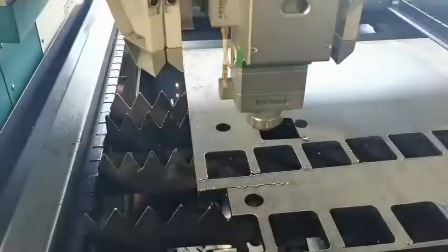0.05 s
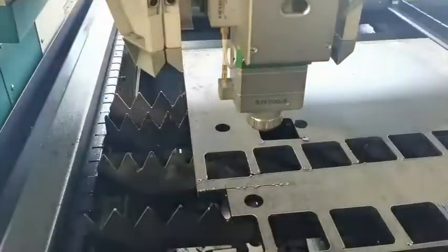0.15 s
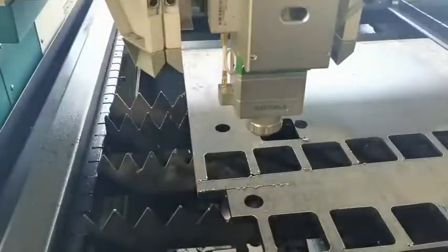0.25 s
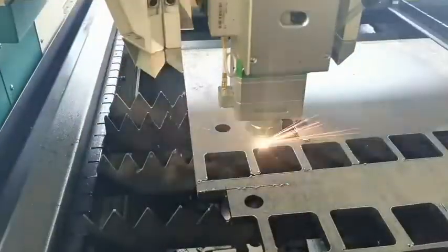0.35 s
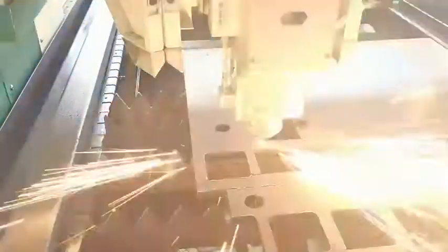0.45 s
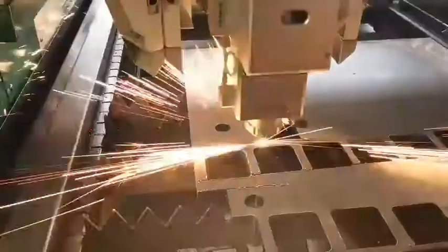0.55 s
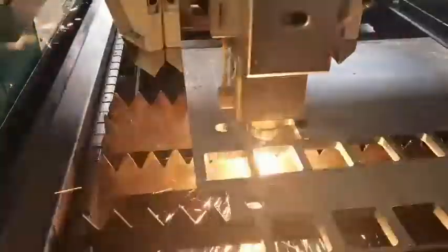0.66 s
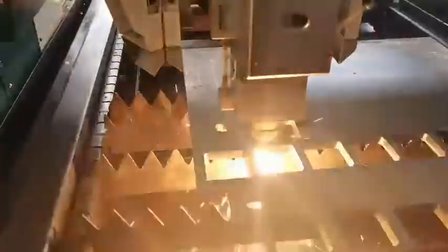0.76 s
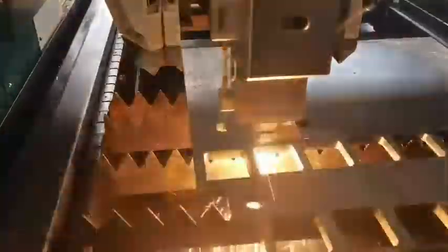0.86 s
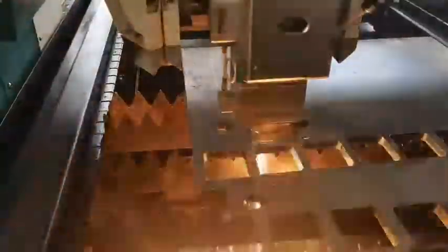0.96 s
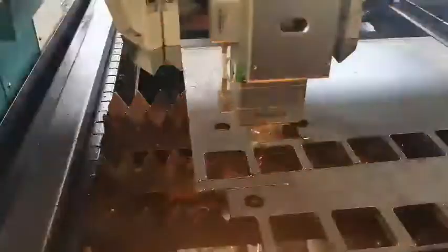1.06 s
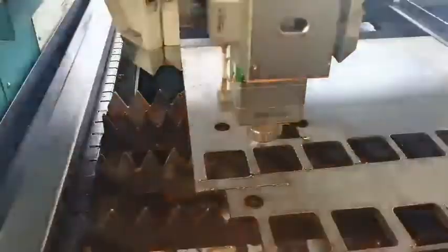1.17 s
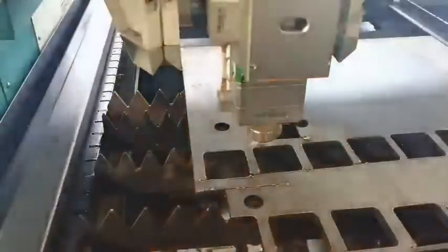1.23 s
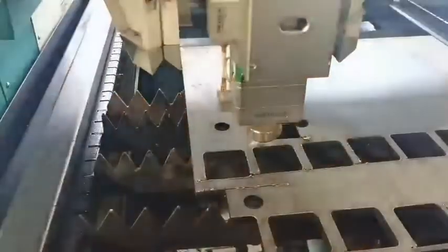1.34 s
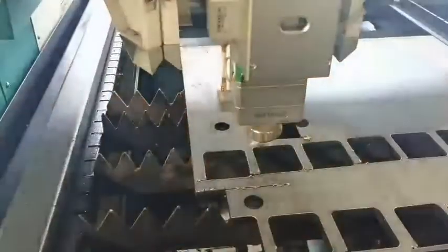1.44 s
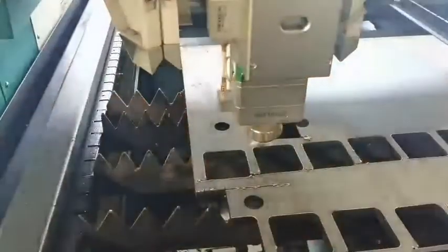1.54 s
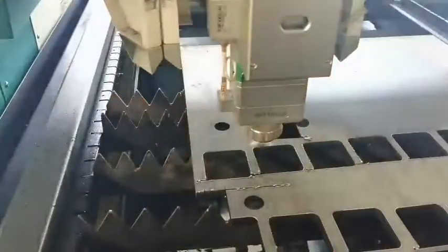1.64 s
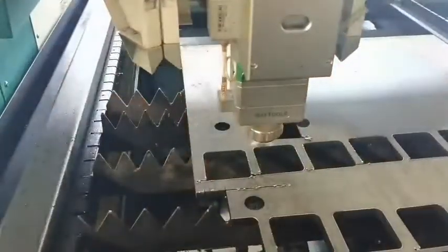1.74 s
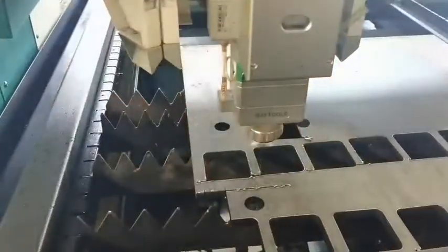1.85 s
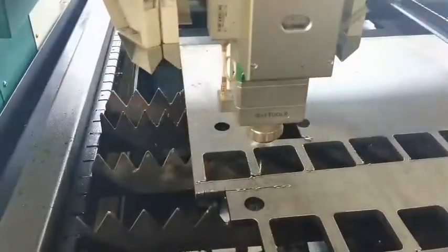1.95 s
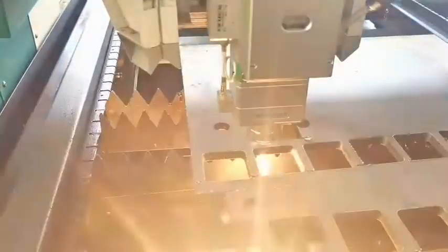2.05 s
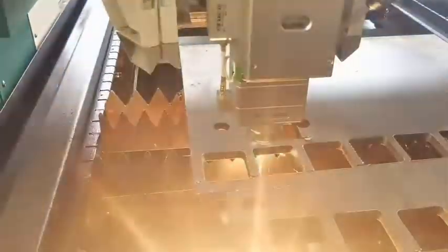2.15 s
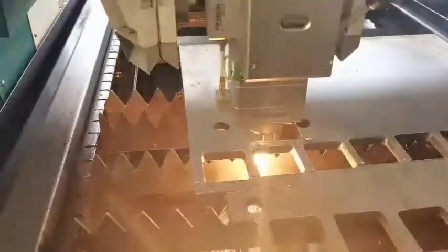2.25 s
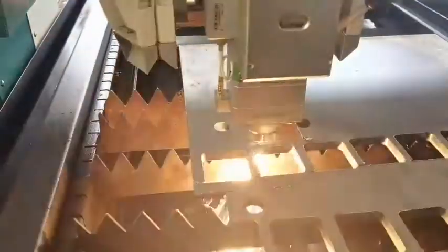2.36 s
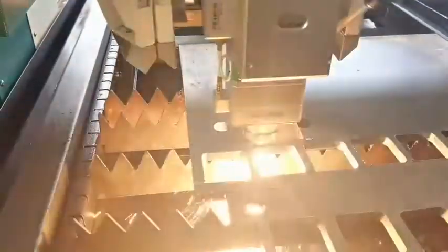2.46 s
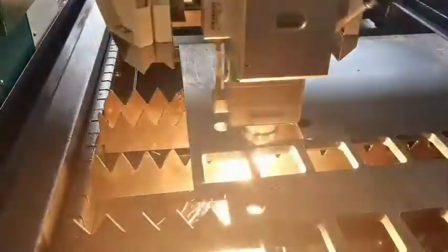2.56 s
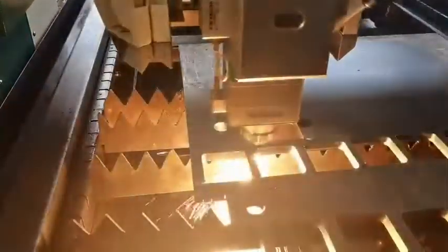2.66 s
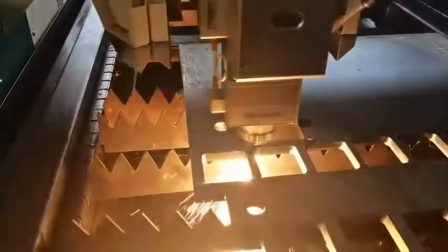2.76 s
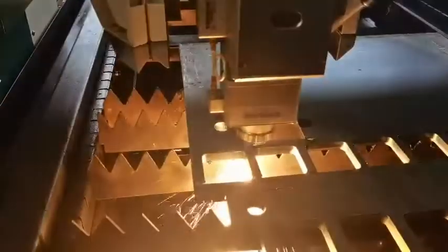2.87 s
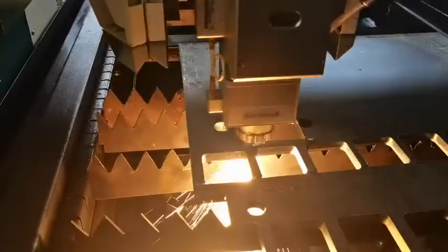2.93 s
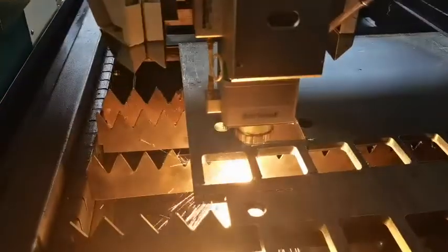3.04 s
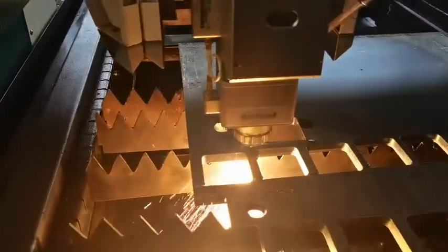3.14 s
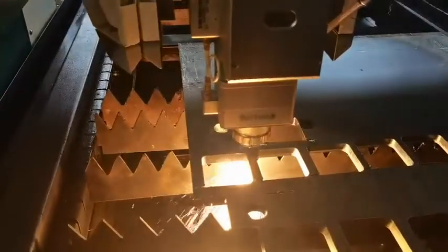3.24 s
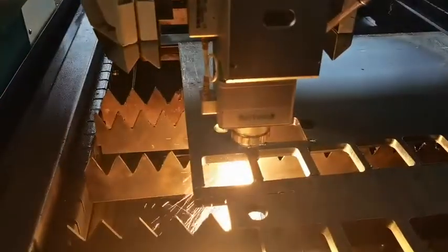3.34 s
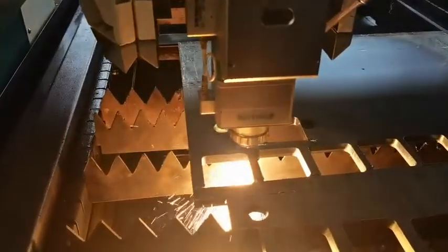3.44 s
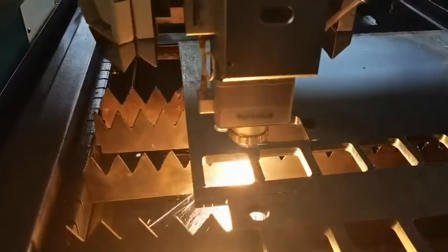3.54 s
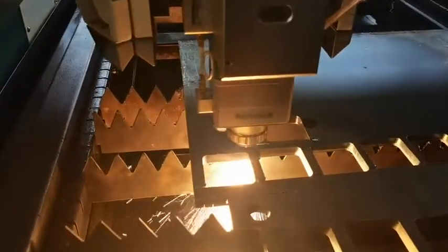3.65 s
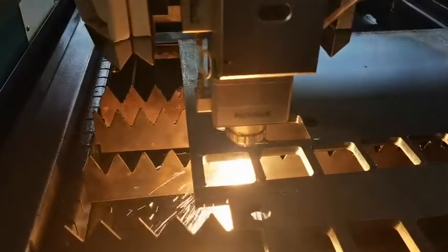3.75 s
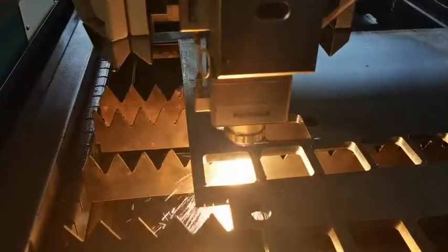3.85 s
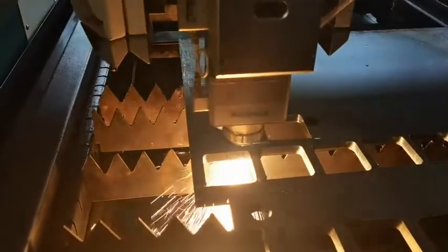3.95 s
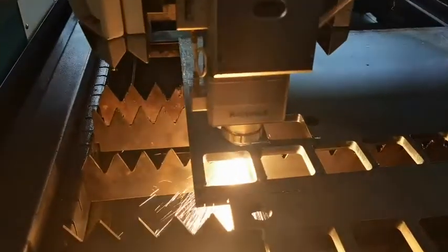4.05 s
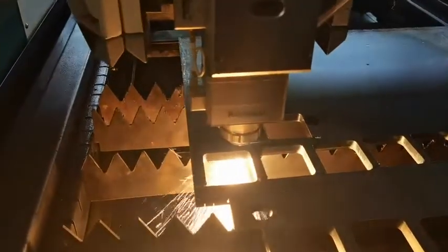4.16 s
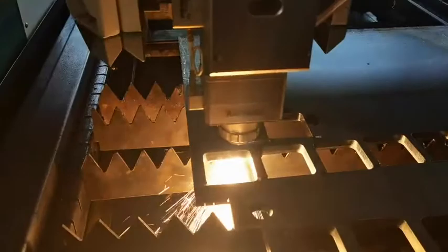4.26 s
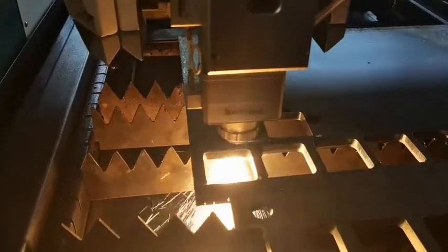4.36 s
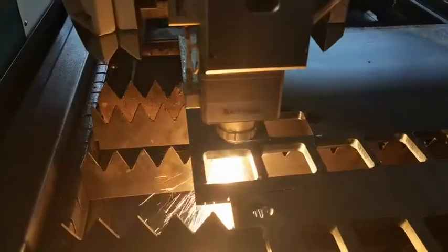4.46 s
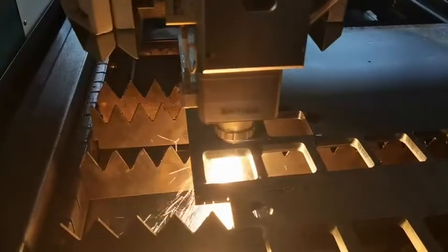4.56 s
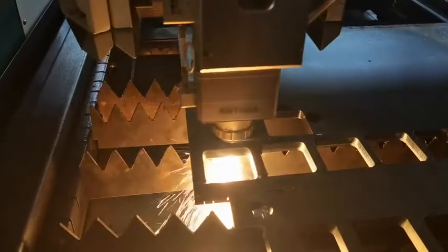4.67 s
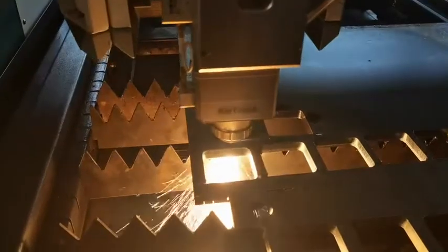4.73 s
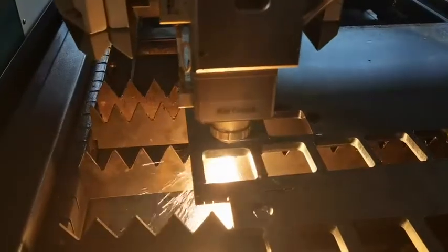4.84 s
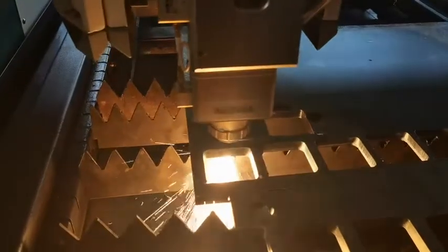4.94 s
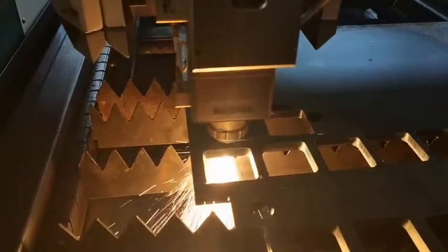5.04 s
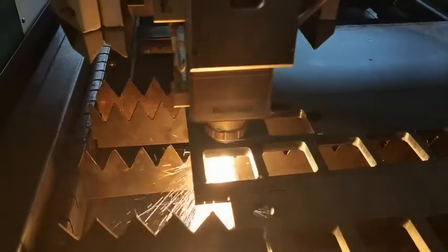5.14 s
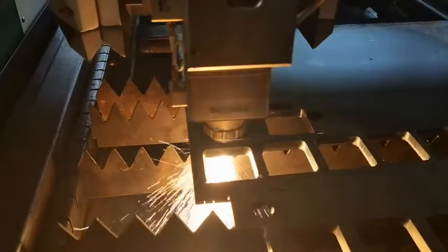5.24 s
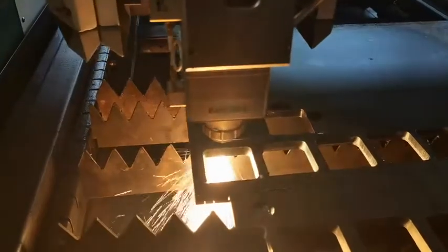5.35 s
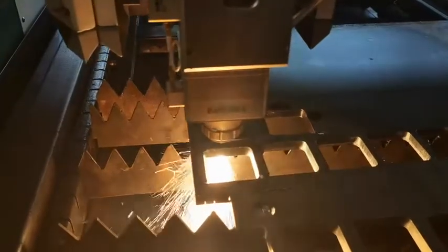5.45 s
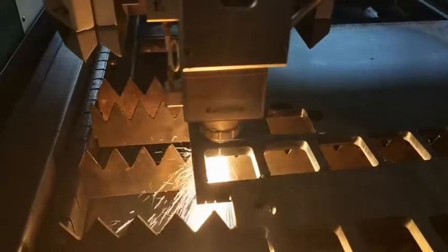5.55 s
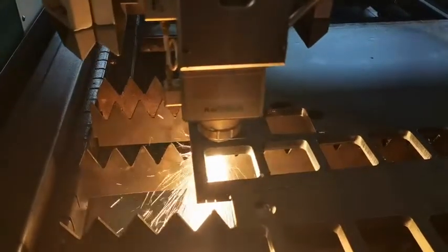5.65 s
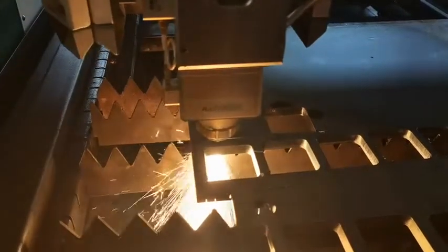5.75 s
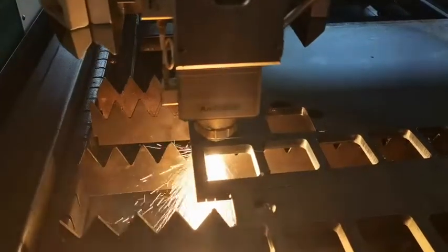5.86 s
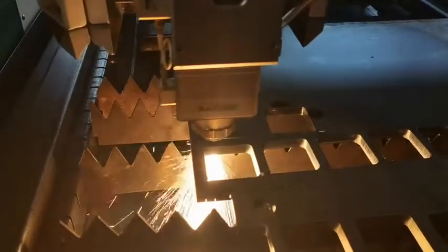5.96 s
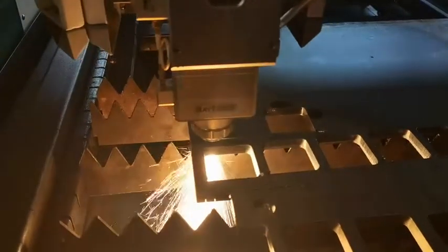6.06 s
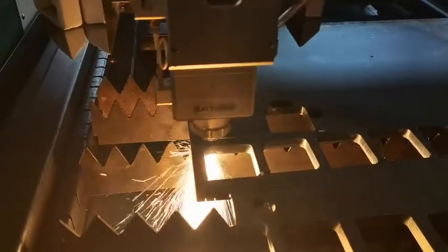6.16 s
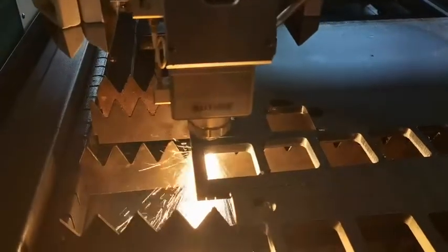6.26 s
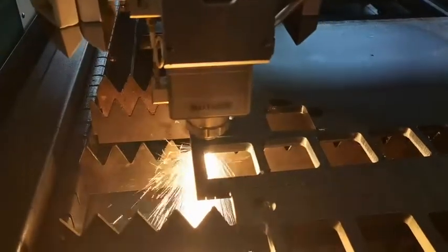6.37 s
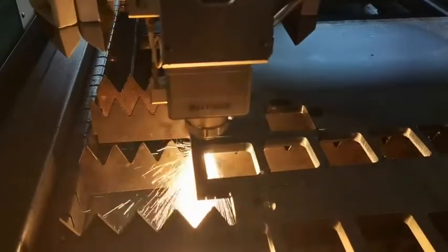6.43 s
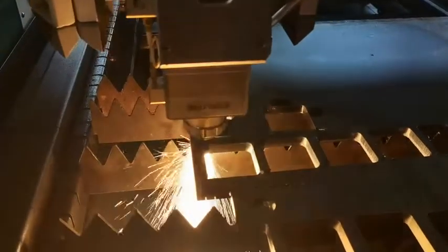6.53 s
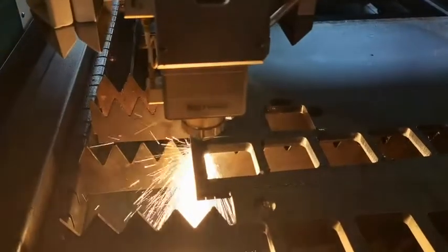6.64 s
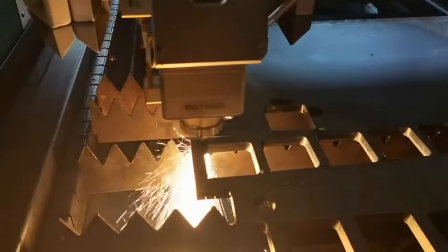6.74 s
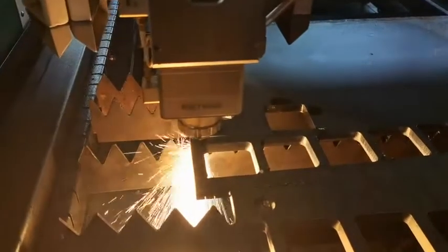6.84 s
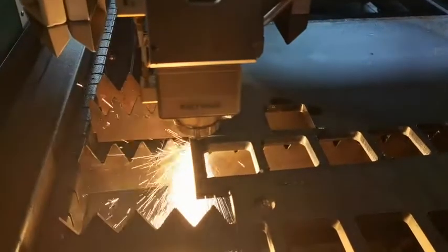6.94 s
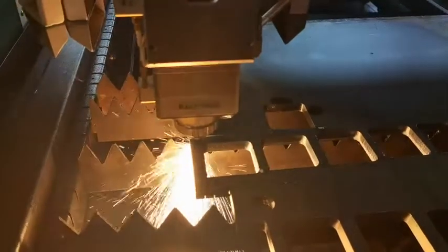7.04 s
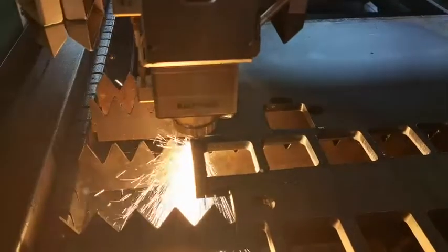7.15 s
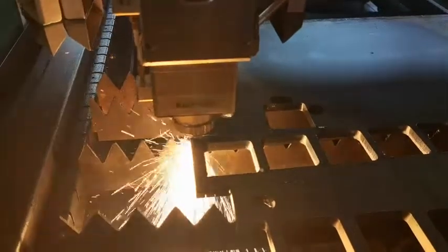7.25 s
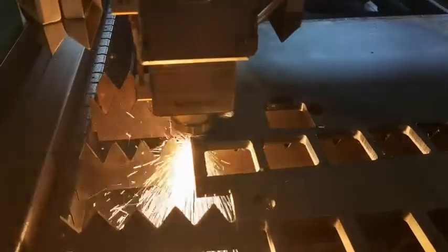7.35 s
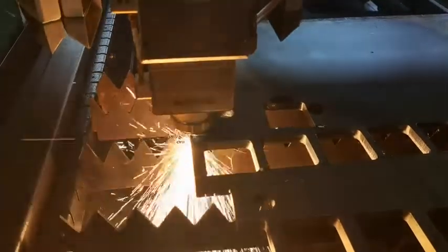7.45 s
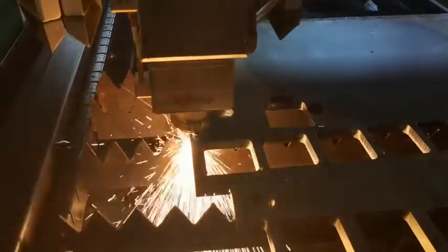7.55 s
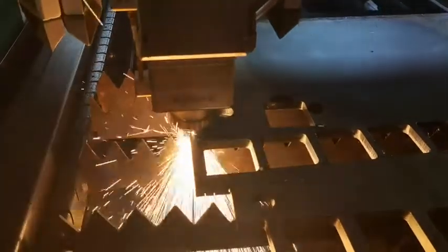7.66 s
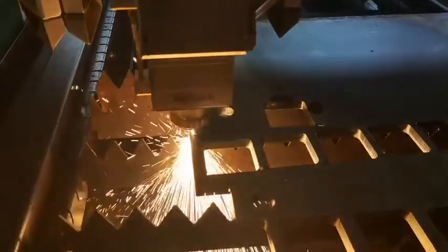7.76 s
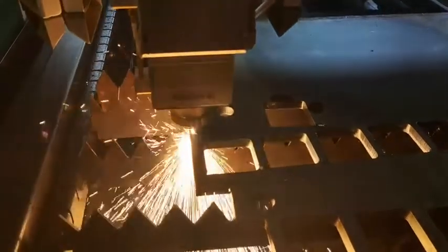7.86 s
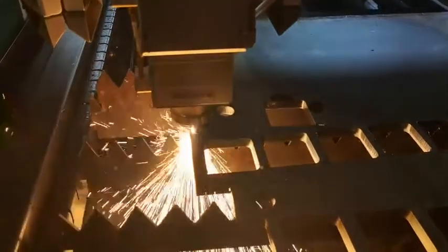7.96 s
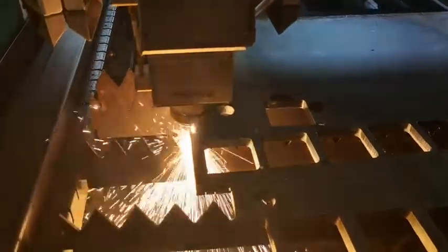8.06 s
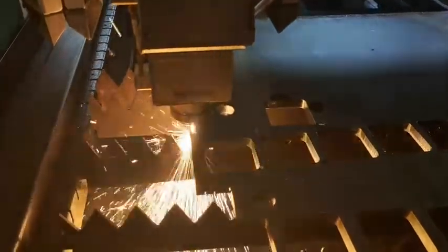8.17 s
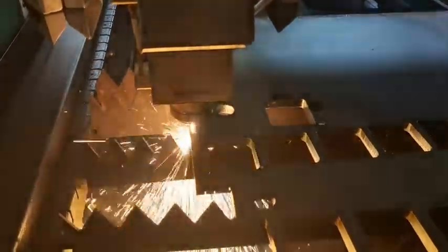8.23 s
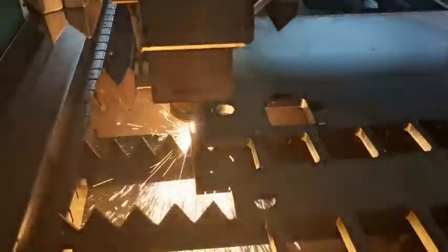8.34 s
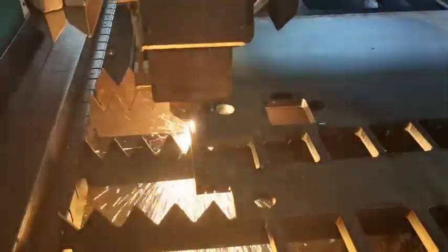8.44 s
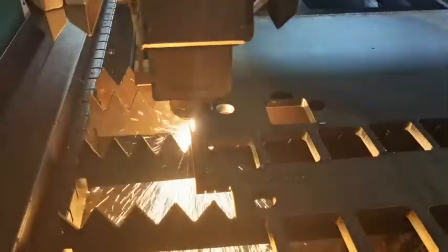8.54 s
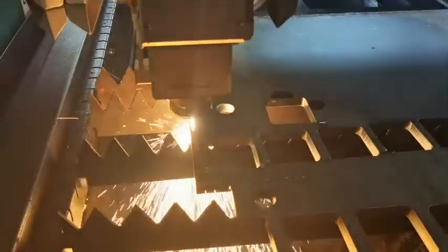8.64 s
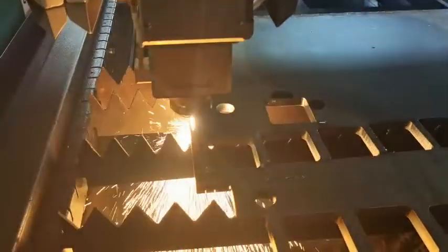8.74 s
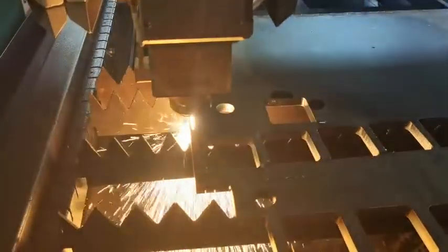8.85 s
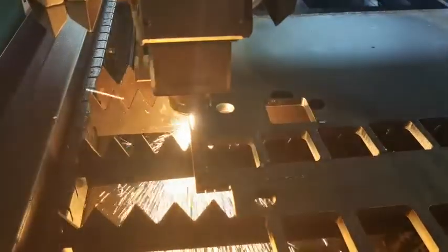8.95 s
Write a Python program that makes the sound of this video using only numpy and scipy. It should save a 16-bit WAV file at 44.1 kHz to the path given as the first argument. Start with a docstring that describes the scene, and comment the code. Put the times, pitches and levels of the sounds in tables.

```python
"""Laser piercing and cutting steel plate

A laser head pierces a thick steel plate and cuts it under a jet of assist gas, heard close by in a factory.
Piercing: pulse-rate harmonics whine and damped pops burst from the melt. The jet then drops for about 0.9 s.
Cutting: after puffs of gas, shaped noise roars in the kerf, splashes on the slats and rumbles under the plate.
Resonant noise moans and whistles over the cut-outs; the shop hisses steadily behind."""
import sys
import numpy as np
from scipy import signal
from scipy.io import wavfile
from scipy.ndimage import uniform_filter1d

SR = 44100
rng = np.random.default_rng(int(sys.argv[2]) if len(sys.argv) > 2 else 0)


def persist_wave(psi):
    """Save psi, clipped to +-1, as 16-bit WAV."""
    counts = np.round(np.clip(psi, -1, 1) * 32767).astype(np.int16)
    wavfile.write(sys.argv[1], SR, np.atleast_2d(counts).T)


N = 396900
HZ = np.fft.rfftfreq(1024, 1 / SR)
FRAME_S = (np.arange(N // 256 + 5) * 256) / SR

# roar colour, one spectrum per stage: freq_hz, density_db (relative)
KERF_COLOURS = [
    [(1060, -28), (1800, -9), (2210, -9.5), (2780, -3.5), (3340, 4.5), (3830, 0.5), (4300, 1), (6300, -5.5),
     (8190, -50), (13900, -120)],
    [(1060, -36.5), (1800, -21), (1970, -16), (2120, -5.5), (2720, -9.5), (3540, -2.5), (3890, -7.5),
     (4210, -4), (4750, -3), (5190, -7.5), (6300, -12), (8190, -15), (13900, -120)],
    [(1060, -25), (1800, -16), (2190, -4.5), (3040, -2), (3390, -1), (4480, -1), (6300, -9.5), (8190, -36),
     (13900, -120)],
    [(1060, -28), (1800, -22), (1890, -10.5), (2040, -18), (2280, -9.5), (2570, -11.5), (3380, -5.5),
     (4550, -8), (5440, -8.5), (6300, -35), (8190, -37), (13900, -120)],
    [(1060, -47), (1800, -19), (2010, -13), (2170, -9.5), (2690, -9.5), (2930, -2.5), (3650, 0), (4250, -8),
     (5220, -6), (6300, -20), (8190, -38), (13900, -120)],
    [(1060, -39), (1800, -16), (1940, -21), (2100, -7.5), (2490, -3), (2710, -5), (3410, -0.5), (6300, -10),
     (8190, -32), (13900, -120)],
]
# cut-out resonances, one list per stage: freq_hz, width_hz, lift_db
KERF_RINGS = [
    [(4400, 180, 1)],
    [(2090, 67, 4.8), (2460, 130, 3.2), (2900, 50, 2), (3280, 73, 1.8), (3635, 46, 9.6), (3900, 60, 5.9),
     (4160, 210, 6.2), (5450, 53, 1.6)],
    [(2110, 90, 3.2)],
    [(3020, 120, 1.5), (3600, 70, 3.1), (3740, 90, 2.8), (5370, 120, 2)],
    [(3340, 78, 1.3), (3500, 65, 3), (3700, 110, 4.6), (5400, 140, 2.8)],
    [(3400, 100, 1.1)],
]
# spectra of nozzle hiss, fine blast and splash on the slats: freq_hz, density_db (relative)
NOZZLE_SPECTRUM = [(5290, -56), (9000, -2.5), (9280, -19), (10100, -3.5), (11900, -1.5), (12500, -3),
                   (13000, -11)]
BLAST_SPECTRUM = [(9000, -30), (12000, -7), (13000, -4), (14200, 0), (15000, -1), (16000, -2)]
SPLASH_SPECTRUM = [(3350, -25), (5700, -3.5), (8100, -3.5), (9800, -4.5), (12700, -33), (21600, -120)]


def jet(port, roar, spray, nozzle, blast):
    """Gas turbulence in four parts; the roar changes colour, not power, from stage to stage."""
    stage = columns(PATH, FRAME_S)[0]
    kerf_db = 0
    for k, (colour, rings) in enumerate(zip(KERF_COLOURS, KERF_RINGS)):
        weight = np.maximum(1 - abs(stage - k), 0)  # crossfade between neighbouring stages
        kerf_db = kerf_db + weight * (read(colour) + lifts(rings))
    kerf_db = kerf_db - 10 * np.log10(np.mean(gain_of(2 * kerf_db), 0))  # equal power per frame

    out = roar * turbulence(port, kerf_db, patchy_db=1.19, flicker_db=0.55)
    out += spray * turbulence(port, read(SPLASH_SPECTRUM), patchy_db=1.0, flicker_db=0.7)
    out += spray * nozzle * turbulence(port, read(NOZZLE_SPECTRUM), patchy_db=0.24, flicker_db=0.26)
    out += spray * blast * turbulence(port, read(BLAST_SPECTRUM), patchy_db=0.94, flicker_db=0.4)
    return out


# gas jet: time_s, kerf_roar_db, spray_db (thrown back by plate, melt and slats)
JET_LEVELS = [(0, -36, -35), (.18, -34, -36), (.26, -39, -38), (.284, -34.5, -32.5), (.43, -29.5, -28.5),
              (.545, -31, -28), (.56, -31.5, -34), (.62, -31, -31), (.75, -32, -36), (.978, -39.5, -40),
              (1.0, -57, -53), (1.89, -58, -50), (1.915, -35, -46), (2.14, -37.5, -43), (2.29, -36, -43),
              (2.33, -29.5, -42), (2.45, -28.5, -39), (3.06, -27.5, -36), (4.5, -25.5, -34.5),
              (4.61, -26.5, -32.5), (4.79, -25, -27), (5.2, -25, -24.5), (5.262, -26, -28),
              (5.285, -25, -25), (5.6, -26, -30.5), (5.645, -30, -33.5), (6.88, -30, -31),
              (7.44, -29.5, -33), (8.22, -29.5, -35), (8.45, -32, -38), (9, -34, -39)]
# head along its path: time_s, stage, left_lead_samples
# stage: 0 gas on closed plate, 1 near side of cut, 2 over a slat, 3 far side, 4 corner, 5 last edge
PATH = [(0, 0, 2.2), (.55, 0, 2.2), (.66, .6, 2.2), (1.85, 1, 2.2), (4.3, 1, 2.2), (4.75, 2, 1.8),
        (5.57, 2, 2.5), (5.66, 3, 4.1), (6.8, 3, 4.1), (7.3, 4, 4.4), (8.15, 4, 5.2), (8.35, 5, 5.6),
        (9, 5, 6.2)]
# puffs before the cut runs: peak_s, rise_s, hold_s, fall_s, roar_db
PUFFS = [(1.975, .03, .01, .06, -31.5), (2.025, 0.027, .01, 0.13, -31), (2.17, .012, 0.015, 0.053, -24.5)]
PUFF_DEPTH_DB, PUFF_SPRAY_DB = -17.5, -9.5  # level at both ends re peak; spray re roar
GUSTS_DB = 0.73  # rms
# balance, one row per stage: nozzle_db, blast_db (re spray);
# rumble_db, lower_hollow_db, upper_hollow_db, low_drone_db, high_drone_db (re roar)
BALANCES = [(0, 4.5, -19.5, -34, -19, -18, -17.5), (1, -3, -25, -23.5, -33, -17, -14),
            (-3, 0.5, -25, -23, -24.5, -16, -12), (-0.5, 2, -22.5, -19, -22, -15.5, -16),
            (-5.5, 5, -14.5, -20, -16, -14, -16.5), (-6, 7.5, -10.5, -19.5, -19.5, -13.5, -15)]


def flow():
    """Gas flow as gains: roar and spray with puffs added in power, and balances along the path."""
    t = np.arange(N) / SR
    roar, spray = gain_of(columns(JET_LEVELS, t))
    for peak_s, rise_s, hold_s, fall_s, roar_db in PUFFS:
        before = (peak_s - t) / rise_s
        after = (t - peak_s - hold_s) / fall_s
        away = np.maximum(np.maximum(before, after), 0)
        puff = gain_of(roar_db + PUFF_DEPTH_DB * away)
        roar = np.hypot(roar, puff)
        spray = np.hypot(spray, puff * gain_of(PUFF_SPRAY_DB))

    gusts = evened(uniform_filter1d(rng.standard_normal(len(FRAME_S)), 25))
    spray = spray * gain_of(GUSTS_DB * np.interp(t, FRAME_S, gusts))

    stage = columns(PATH, t)[0]
    balances = [gain_of(np.interp(stage, range(len(BALANCES)), db)) for db in np.transpose(BALANCES)]
    return roar, spray, balances


# piercing whine: time_s, harmonic_1_db, harmonic_2_db, harmonic_3_db, left_minus_right_1_db
WHINE = [(0.278, -46, -28, -37, -0.5), (0.302, -37, -29, -41, -1), (0.348, -32, -33, -39, -2),
         (0.428, -31, -26, -38, -4.5), (0.54, -28.5, -28, -38, -1.0), (0.574, -31, -32, -43, -12),
         (0.6, -28, -27, -44, -8.5), (0.636, -33, -26, -45, -13), (0.7, -30, -23, -39, -16.5),
         (0.722, -19, -31, -34, -18.0), (0.752, -29, -18.5, -27, -1.5), (0.782, -15.5, -24, -41, -3),
         (0.82, -20, -27, -32, -5.0), (0.848, -27, -22, -44, -17), (0.874, -22, -30, -43, -20.5),
         (0.9, -22.5, -23.5, -33, -15.0), (0.948, -18, -26.5, -39, -10.5), (0.976, -16, -23.5, -41, -8.0),
         (0.99, -31, -26, -46, -4), (1.006, -44, -45, -63, -2.0), (1.018, -45, -52, -63, -4.5),
         (1.07, -63, -49, -63, -2.5)]
# left_minus_right_db of harmonics 2 and 3
UPPER_PAN_DB = (-13, -8)
PULSE_HZ = 5000
THROUGH_S = 0.62  # beam breaks through
BOILING_DB, THROUGH_DB = 4, 2  # rms flutter before and after breakthrough
DROP_DB, DROP_S = -6, 0.026  # dip at breakthrough and its recovery time


def whine():
    """Beam pulse rate and two overtones; boiling melt flutters level and phase at each port."""
    t = np.arange(WHINE[0][0], WHINE[-1][0], 1 / SR)
    *level_db, first_pan_db = columns(WHINE, t)
    flutter_db = np.where(t < THROUGH_S, BOILING_DB, THROUGH_DB)
    since = t - THROUGH_S
    dip_db = DROP_DB * (since > 0) * np.maximum(1 - (since / DROP_S) ** 2, 0)
    pans_db = [first_pan_db, *UPPER_PAN_DB]

    out = np.zeros((2, N))
    start = round(t[0] * SR)
    for k, db in enumerate(level_db + dip_db):
        flutter = rng.standard_normal((4, len(t)))
        flutter = evened(uniform_filter1d(uniform_filter1d(flutter, 250), 250))
        level_flutter, phase_flutter = flutter[:2], flutter[2:]
        sides = gain_of(np.outer([0.5, -0.5], pans_db[k]))
        phase_rad = 2 * np.pi * (k + 1) * PULSE_HZ * t + 0.14 * flutter_db * phase_flutter
        level = gain_of(db + flutter_db * level_flutter) * sides / sides.mean(0)
        tone = np.sqrt(2) * level * np.cos(phase_rad)
        out[:, start:start + len(t)] += tone * signal.windows.tukey(len(t), 0.01)
    return out


# melt pops: time_s, crack_db, left_share (signed, of the crack), left_swing_db, right_swing_db
POPS = [(0.2801, -6.5, -0.53, -11, -16), (0.299, -21, .3, -36, -19), (0.322, -16, .2, -36, -32),
        (0.3294, -8, 0.4, -35, -10), (0.345, -17, .9, -28, -26), (.363, -20, 0.42, -28, -32),
        (.389, -34, .6, -29, -25), (.41, -18, 0.45, -28, -30), (.425, -22, 0.094, -34, -22),
        (0.446, -19, .9, -28, -27), (0.4622, -18, 0.97, -31, -24), (0.476, -13, -0.057, -36, -20),
        (0.4801, -15, .8, -20, -13), (.513, -22, 0.17, -32, -21), (.527, -18, .8, -33, -30)]
SWING_HZ = 74.6  # right port


def pops():
    """A sharp push of gas, then a slow swing back through zero, quicker at the left port."""
    out = np.zeros((2, N))
    t = np.arange(1500) / SR
    swing_hz = [1.4 * SWING_HZ, SWING_HZ]
    for time_s, crack_db, left_share, left_db, right_db in POPS:
        crack = gain_of(crack_db) * np.exp(-t / 0.0002) * np.array([[left_share], [1]])
        if left_share < 0:
            crack[0] = np.roll(crack[0], round(0.0005 * SR))  # suction trails the push
        swing = np.sin(2 * np.pi * np.outer(swing_hz, t)) * np.exp(-t / 0.0047)
        swing = gain_of([[left_db], [right_db]]) * swing
        out[:, round(time_s * SR):][:, :len(t)] += crack - swing
    return out


# spectra of rumble, low drone and high drone: freq_hz, density_db (relative)
RUMBLE_SPECTRUM = [(15, -49), (25, -33), (54, -6), (145, 2), (180, -2), (230, -55), (400, -120)]
LOW_DRONE_SPECTRUM = [(260, -46), (440, -3.5), (782, -4.5), (858, 3.5), (1150, -6), (1500, -46),
                      (2530, -120)]
HIGH_DRONE_SPECTRUM = [(650, -24), (1100, -9), (1390, -2), (1710, -3.5), (2000, -6.5), (2600, -3),
                       (4400, -120)]
# slat resonances: freq_hz, width_hz, lift_db
SLATS = [(669, 290, 14), (916, 89, 6.5), (1096, 58, 12), (1405, 170, 7), (1890, 70, 13.5)]
# hollows of the bed, lower and upper: freq_hz, width_hz
HOLLOWS = [(218, 53), (335, 139)]


def bed(port, roar, shares):
    """Burning gas under the plate, lumpy and low, ringing the hollows and slats of the bed."""
    rumble, *hollows, low_drone, high_drone = flame(roar, shares)
    slats_db = lifts(SLATS)
    out = rumble * turbulence(port, read(RUMBLE_SPECTRUM), patchy_db=2.8, flicker_db=0.31)
    out += low_drone * turbulence(port, read(LOW_DRONE_SPECTRUM) + slats_db, patchy_db=0.92, flicker_db=0.4)
    out += high_drone * turbulence(port, read(HIGH_DRONE_SPECTRUM) + slats_db, patchy_db=1.9, flicker_db=1.5)
    for gain, (freq_hz, width_hz) in zip(hollows, HOLLOWS):
        out += gain * ringing(freq_hz, width_hz)
    return out


# flame flares under the plate: start_s, length_s, rumble_db, lower_hollow_db, upper_hollow_db, low_drone_db
FLARES = [(2.282, 0.36, -65, -45, -54, -61), (2.8, 0.27, -52, -43, -56, -53),
          (3.38, 0.23, -44.5, -50, -53, -61), (3.597, .3, -55, -42, -69, -50),
          (3.953, 0.56, -41, -50, -50, -40.5), (4.63, .4, -37, -44.5, -42.5, -43),
          (5.983, 0.5, -55, -47.5, -43, -56), (7.055, 0.42, -60, -42, -68, -62),
          (7.27, 0.31, -48, -39, -40.5, -41.5), (7.44, .6, -45, -42.5, -37, -42),
          (8.132, 0.26, -37.5, -53, -40, -40), (8.294, 0.36, -42.5, -47, -60, -48),
          (8.7, .3, -53, -58, -63, -58)]
# floor with the gas off: rumble_db, lower_hollow_db, upper_hollow_db, low_drone_db, high_drone_db
IDLE_DB = (-56.5, -66, -65, -56.5, -63)
FLARE_HIGH_DRONE_DB = -3.5  # re low drone
LUMPS_DB = 2  # rms


def flame(roar, shares):
    """Flame gains: all follow the roar and jump in flares; rumble and hollows also swell at random."""
    power = (roar * np.array(shares)) ** 2 + gain_of(IDLE_DB)[:, None] ** 2
    lumps = evened(uniform_filter1d(rng.standard_normal((3, len(FRAME_S))), 20))
    lumps = np.array(columns(np.c_[FRAME_S, lumps.T], np.arange(N) / SR))
    power[:3] *= gain_of(2 * LUMPS_DB * lumps)
    for start_s, length_s, *levels_db in FLARES:
        shape = signal.windows.tukey(round(length_s * SR), 0.6)
        gains = gain_of(levels_db + [levels_db[3] + FLARE_HIGH_DRONE_DB])
        power[:, round(start_s * SR):][:, :len(shape)] += np.outer(gains, shape) ** 2
    return np.sqrt(power)


# jet over a cut-out: start_s, length_s, pitch_hz, width_hz, level_db
MOANS = [(0.623, 0.39, 2370, 220, -45), (2.3, 0.91, 2160, 70, -41), (2.311, 0.98, 3545, 80, -49),
         (3.9, 0.91, 4200, 90, -46), (5.62, 1.3, 3494, 55, -38.5), (6.034, 0.17, 868, 60, -40),
         (7.002, 1.2, 3600, 130, -39), (8.17, 0.17, 875, 120, -39)]


def moans():
    """Moans and faint whistles of the jet over a cut-out: narrow resonant noise, faded in and out."""
    out = np.zeros((2, N))
    for start_s, length_s, pitch_hz, width_hz, level_db in MOANS:
        part = out[:, round(start_s * SR):round((start_s + length_s) * SR)]
        size = part.shape[1]
        part += gain_of(level_db) * signal.windows.tukey(size, 0.4) * ringing(pitch_hz, width_hz, size)
    return out


# idle shop hiss: freq_hz, density_db (relative)
SHOP_SPECTRUM = [(18, -54), (30, -8), (95, -4.5), (173, -18), (257, -10.5), (535, -19.5), (1790, -16),
                 (4240, -2.5), (6790, -10.5), (9300, -3.5), (10100, -0.5), (11800, -0.5), (12700, -8),
                 (14500, 0.5), (15700, -5.5)]
SHOP_DB = -32.5


def shop(port):
    """Idle hiss of the shop: steady broadband noise."""
    return gain_of(SHOP_DB) * turbulence(port, read(SHOP_SPECTRUM), patchy_db=1.3, flicker_db=0.3)


# likeness of the two ports: freq_hz, likeness (0-1)
LIKENESS = [(30, 0.43), (70, 0.42), (150, 1), (400, 0.99), (1000, 0.67), (2000, 0.5), (4000, 0.69),
            (8000, 0.67), (15000, 0.77)]


def turbulence(port, colour_db, patchy_db, flicker_db):
    """Stereo noise of mid rms 1, with short patches and flicker over all bands."""
    a, b, c, d = rng.standard_normal((4, len(HZ), len(FRAME_S)), dtype=np.float32)
    same = np.clip(read(LIKENESS), 0, 1)
    right = a + 1j * b
    left = same * right + np.sqrt(1 - same ** 2) * (c + 1j * d)
    flicker = evened(uniform_filter1d(rng.standard_normal(len(FRAME_S)), 4))
    patches = drifting(count=1, bins=8, frames=10)
    field = gain_of(colour_db + patchy_db * patches + flicker_db * flicker)
    spectra = (np.array([left, right]) * field * port).astype(np.complex64)
    sound = signal.istft(spectra, nperseg=1024, noverlap=768)[1][:, :N]
    return sound / np.sqrt(np.mean(sound.mean(0) ** 2))


def ringing(freq_hz, width_hz, size=N):
    """Noise through one resonance twice, nearly alike at both ports and louder on the right."""
    shared, *own = rng.standard_normal((3, size))
    b, a = signal.iirpeak(freq_hz, freq_hz / width_hz, SR)
    sound = signal.lfilter(b, a, signal.lfilter(b, a, shared + 0.54 * np.array(own)))
    return evened(sound) * gain_of([[-1.8], [1.8]])


# microphone port balance: freq_hz, left_minus_right_db
PORT_BALANCE = [(60, -2.5), (300, -4), (1000, -2.5), (3600, -4.5), (6000, -2.5), (8200, 1.9), (9300, -2.5),
                (10300, -6), (11500, -11), (12600, -7), (14000, -5.5), (15700, -6)]


def ports():
    """Complex gain of each port: balance, left lead along the path, drifting ripples from metal nearby."""
    left_db, right_db, phase = drifting(count=3, bins=2, frames=90)
    balance_db = np.array([0.5, -0.5])[:, None, None] * read(PORT_BALANCE)
    ripple_db = 3.1 * np.array([left_db, right_db])
    lead_rad = 2 * np.pi * HZ[:, None] * columns(PATH, FRAME_S)[1] / SR
    lead_rad = lead_rad + 2.15 * np.tanh(HZ / 5500)[:, None] * phase
    return gain_of(balance_db + ripple_db) * np.exp(1j * np.array([lead_rad, 0 * lead_rad]))


def drifting(count, bins, frames):
    """Random fields of rms 1 over frequency and time, smoothed over so many bins and frames."""
    field = rng.standard_normal((count, len(HZ), len(FRAME_S)), dtype=np.float32)
    return evened(uniform_filter1d(uniform_filter1d(field, bins, axis=1), frames, axis=2))


def gain_of(db):
    """Amplitude gain from dB."""
    return 10 ** (np.asarray(db) / 20)


def evened(x):
    """Scale to rms 1."""
    return x / np.sqrt(np.mean(x ** 2) + 1e-20)


def read(points):
    """Table values at the spectrum bins, interpolated over log frequency."""
    freq_hz, value = np.transpose(points)
    return np.interp(np.log(HZ + 1), np.log(freq_hz + 1), value)[:, None]


def lifts(rings):
    """Sum of resonance humps in dB at the spectrum bins."""
    return sum(db / (1 + (2 * (HZ - hz) / width_hz) ** 2) for hz, width_hz, db in rings)[:, None]


def columns(rows, t):
    """Every column after the first, interpolated at times t."""
    time_s, *values = np.transpose(rows)
    return [np.interp(t, time_s, v) for v in values]


def scene():
    """Sum of jet, whine, pops, bed, moans and shop hiss."""
    port = ports()
    roar, spray, (nozzle, blast, *shares) = flow()
    out = jet(port, roar, spray, nozzle, blast)
    out += whine() + pops()
    out += bed(port, roar, shares) + moans()
    return out + shop(port)


EDGE_HZ = 15740


def record(dry):
    """The microphone loses the deepest bass; a steep linear-phase low-pass limits the band."""
    bass_cut = signal.butter(2, 45, "highpass", fs=SR, output="sos")
    heard = signal.sosfilt(bass_cut, dry)
    band_limit = signal.firwin(2047, EDGE_HZ, window=("kaiser", 9), fs=SR)
    return signal.oaconvolve(heard, band_limit[None], "same")


dry = scene()
out = record(dry)
persist_wave(out)
```